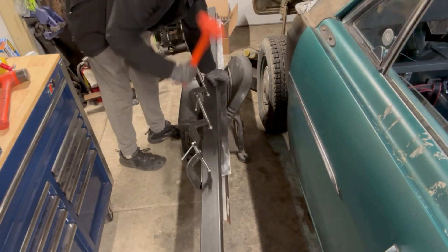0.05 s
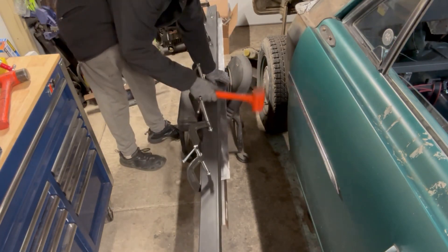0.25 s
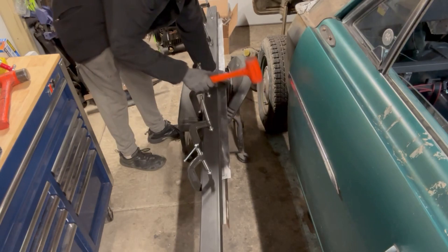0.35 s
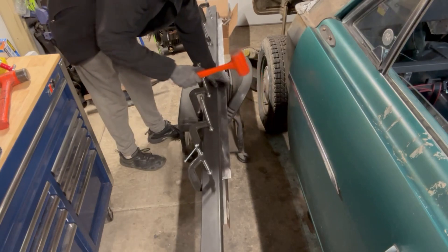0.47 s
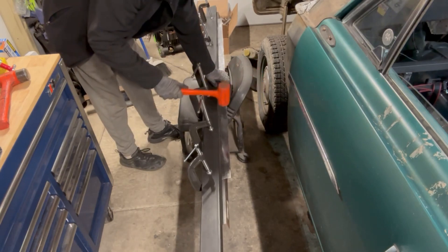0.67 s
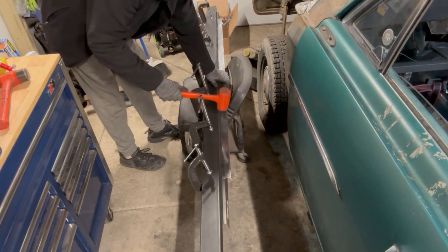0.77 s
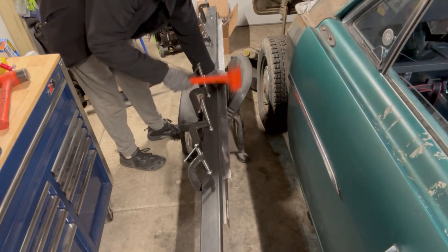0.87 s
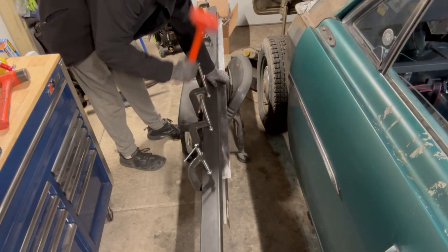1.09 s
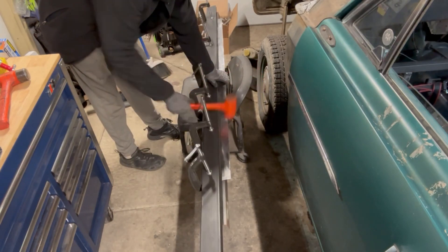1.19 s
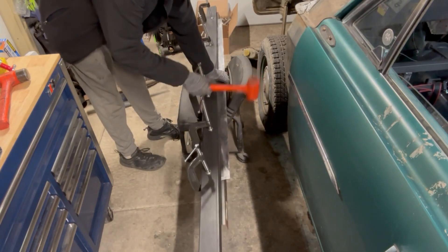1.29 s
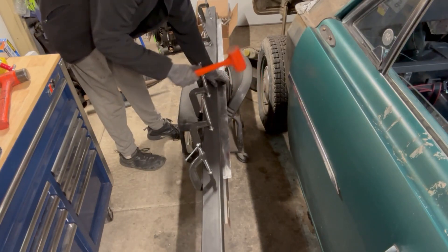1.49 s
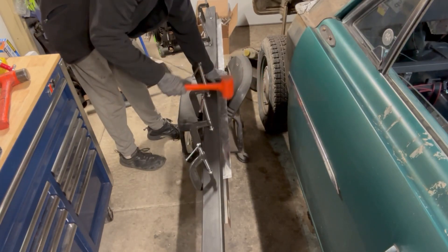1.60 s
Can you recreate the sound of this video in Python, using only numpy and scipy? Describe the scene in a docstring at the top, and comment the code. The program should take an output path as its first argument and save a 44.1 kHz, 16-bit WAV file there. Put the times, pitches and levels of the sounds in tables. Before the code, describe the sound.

Mallet blows on clamped sheet steel: the tail of an earlier hit fades, then two cracking, chattering clangs a second apart, with a faint sleeve rustle between, close stereo microphones in a quiet home garage.

```python
"""The tail of an earlier contact dies away over a quiet low floor, then a mallet hits sheet steel clamped over
a bending edge twice, in a home garage, close to a small stereo recorder. Each blow cracks and the sheet chatters
against the edge: noise shaped in bands that decay with the room, plus decaying sines for distinct pitched modes.
Between the blows a sleeve or glove rustles: coloured noise with a grainy level and small ticks."""
import sys
import numpy as np
from scipy import signal
from scipy.fft import rfft, irfft
from scipy.io import wavfile
from scipy.ndimage import uniform_filter1d

SR = 44100
rng = np.random.default_rng(int(sys.argv[2]) if len(sys.argv) > 2 else 0)


def store_wav(level_fs):
    """Save 16-bit WAV to argv[1]."""
    pcm = np.round(np.clip(np.atleast_2d(level_fs), -1, 1) * 32767)
    wavfile.write(sys.argv[1], SR, pcm.T.astype(np.int16))


def undo_db(level):
    """Turn decibels back into plain size, where 20 dB means ten times bigger."""
    steps = np.asarray(level, float) / 20
    return 10 ** steps


N = 72765  # samples in the scene


def evened(x):
    """Normalisation: scales to rms 1."""
    return x / np.sqrt(np.mean(x ** 2) + 1e-20)


def read(points, hz):
    """Interpolation on a log-frequency axis: reads a table of (frequency_hz, value)."""
    f, value = np.transpose(points)
    return np.interp(np.log(hz + 1), np.log(f + 1), value)


def add(mix, start_s, sound):
    """Superposition: mixes a stereo sound in; a negative start leaves only its later part."""
    at = round(start_s * SR)
    sound = sound[:, max(-at, 0):]
    part = mix[:, max(at, 0):][:, :sound.shape[1]]
    part += sound[:, :part.shape[1]]


def stereo_noise(size, tone, likeness):
    """Partial coherence: the right spectrum shares part of the left; both coloured by tone, rms 1."""
    hz = np.fft.rfftfreq(size, 1 / SR)
    left, other = rfft(rng.standard_normal((2, size)))
    shared = np.clip(read(likeness, hz), -1, 1)
    right = shared * left + np.sqrt(1 - shared ** 2) * other
    gain = undo_db(np.maximum(read(tone, hz), -100))
    return hz, np.array([left, right]) * gain / np.sqrt(np.mean(gain ** 2))


# Relative power spectrum of the dense clang: frequency_hz, density_db_per_hz
CLANG_TONE = [(24, -57.5), (40, -29), (277, -14), (348, -9.5), (561, -9.5), (818, -7.5), (882, -10.5),
              (1500, -5.5), (1700, -7), (1830, -6), (9610, -17), (14000, -32), (16300, -77)]
# Decay of the sheet's modes: frequency_hz, t60_s
SHEET_DECAY = [(60, .2), (200, .25), (500, .25), (1200, 0.25), (2500, 0.27), (5000, 0.31), (9000, 0.24),
               (15000, 0.19)]
# Decay of the room: frequency_hz, t60_s
ROOM_DECAY = [(60, .4), (250, .7), (1000, .5), (4000, 0.49), (9000, 0.42), (15000, .21)]
# Room level relative to the clang: frequency_hz, level_db
ROOM_LEVEL = [(60, -15.5), (250, -14), (1000, -14.5), (4000, -12.5), (9000, -21), (15000, -16.5)]
# Time constant of the clang's onset: frequency_hz, rise_s
CLANG_RISE = [(60, 0.0082), (300, 0.004), (1000, 0.0063), (4000, .001)]
# Relative power spectrum of the crack: frequency_hz, density_db_per_hz
CRACK_TONE = [(100, -33), (500, -8), (1500, -1), (3000, -2), (6000, -4), (10000, -8.5), (14000, -15.5),
              (16300, -28)]
# Left-right coherence of clang and crack: frequency_hz, likeness (no unit)
CLANG_LIKENESS = [(60, 0.24), (130, 0.84), (290, 0.24), (640, 0.098), (1410, 0.28), (3100, 0.3),
                  (6820, 0.041), (15000, 0.86)]
# Stereo balance of the clang: frequency_hz, left_minus_right_db
CLANG_BALANCE = [(60, -2), (180, 0.5), (550, -1.0), (1650, 0.5), (4970, 1.5), (15000, 1.5)]


def clang(level_db, tilt_db_per_octave, crack_db):
    """High modal density: close modes act as noise; after a short crack each band rises and dies at its own speed."""
    size = 32768
    crack_t60_s, crack_rise_s = 0.017, 0.0003
    t = np.arange(size) / SR

    hz, spectrum = stereo_noise(size, CLANG_TONE, CLANG_LIKENESS)
    # close modes gather in peaks and gaps, 3.5 dB rms about a 1 dB lift
    clumps = evened(uniform_filter1d(rng.standard_normal(len(hz)), size=20))
    spectrum = spectrum * undo_db(3.5 * clumps + 1.0)
    pan = undo_db(read(CLANG_BALANCE, hz) / 2)
    tilted_db = level_db + tilt_db_per_octave * np.log2((hz + 1) / 2000)
    spectrum = spectrum * undo_db(tilted_db) * np.array([pan, 1 / pan])

    crack_noise = irfft(stereo_noise(size, CRACK_TONE, CLANG_LIKENESS)[1])
    out = crack_noise * undo_db(crack_db - 60 * t / crack_t60_s) * (1 - np.exp(-t / crack_rise_s))

    mids_hz = np.geomspace(60, 15000, num=9)
    for k, mid_hz in enumerate(mids_hz):
        # overlapping triangular bands on the log-frequency axis
        share = np.interp(np.log(hz + 1), np.log(mids_hz), np.arange(len(mids_hz)) == k)
        sheet = undo_db(-60 * t / read(SHEET_DECAY, mid_hz))
        room = undo_db(read(ROOM_LEVEL, mid_hz) - 60 * t / read(ROOM_DECAY, mid_hz))
        rise = 1 - np.exp(-t / abs(read(CLANG_RISE, mid_hz)))
        out = out + irfft(spectrum * share) * np.sqrt(sheet ** 2 + room ** 2) * rise
    return out


# Mallet blows and the chatter of the sheet after them; a negative start lies before the scene:
# start_s, level_db, treble_tilt_db_per_octave, crack_db
CONTACTS = [(0.2486, -18.5, -0.5, -6), (0.2517, -25, -.5, -17), (0.2581, -21.5, 0, -14.5),
            (0.2656, -20, 2, -7), (0.2767, -25.5, -3, -13.5), (0.315, -38, 0, -38.5),
            (0.375, -48.5, 1.5, -45.5), (0.410, -44.5, -1, -53), (0.443, -49.5, 0, -43),
            (1.2929, -21, -1, -8), (1.2967, -22, 0, -16), (1.3046, -19.5, 1.5, -24.5),
            (1.3110, -18.5, -1, -19), (1.3280, -28, -1.5, -24), (1.345, -35, -4.5, -32),
            (1.40, -49, -1.5, -43), (1.47, -50, -2, -59), (-0.30, -20, -2, -19)]
# Full blows, each on its own spot: start_s
BLOWS = [0.2486, 1.2932]


def steel():
    """Impact excitation: every contact clangs; the full blows also set the distinct pitched modes going."""
    out = np.zeros((2, N))
    for start_s, level_db, tilt_db_per_octave, crack_db in CONTACTS:
        add(out, start_s, clang(level_db, tilt_db_per_octave, crack_db))
    for spot, start_s in enumerate(BLOWS):
        add(out, start_s, rings(spot))
    return out


# Relative power spectrum of the floor: frequency_hz, density_db_per_hz
FLOOR_TONE = [(12, -40.5), (30, -19.5), (55, -1), (75, -3.5), (120, -9), (250, -13), (500, -20.5),
              (800, -21.5), (1100, -29), (1600, -34.5), (3200, -38), (6300, -53.5), (13000, -60),
              (16000, -66)]
# Floor level over time, before a fixed lift: time_s, level_before_lift_db
FLOOR_COURSE = [(0.0, -72.5), (0.348, -66.5), (1.074, -70.5), (1.286, -64.5), (1.65, -73.5)]
# Left-right coherence of the floor: frequency_hz, likeness (no unit)
FLOOR_LIKENESS = [(60, 0.95), (180, 0.82), (550, 0.35), (1650, 0.17), (4970, 0.1), (15000, 0.18)]


def floor():
    """Broadband noise weighted to low frequencies: the rumble of the garage and faint hiss."""
    time_s, level_db = np.transpose(FLOOR_COURSE)
    noise = irfft(stereo_noise(N + 1, FLOOR_TONE, FLOOR_LIKENESS)[1])[:, :N]
    lift_db = 8.5
    return noise * undo_db(np.interp(np.arange(N) / SR, time_s, level_db) + lift_db)


# Distinct pitched modes of sheet and edge bar: pitch_hz
MODE_PITCH = [72, 175, 245, 328, 409, 490, 700, 736, 828, 1039, 1320, 1476, 1529, 1626, 1800, 1871, 2045,
              2270, 2392, 2621, 2878, 3141, 3827, 4201, 4384, 4737]
# The same modes in order, some short, some longer: t60_s, level_at_spot_0_db, level_at_spot_1_db
MODE_RING = [(.15, -52, -35.5), (.25, -33.5, -31), (.85, -42, -44.5), (.75, -39.5, -44.5),
             (0.7, -45.5, -37), (.5, -38, -35.5), (.2, -41, -29.5), (.55, -37.5, -37), (0.26, -31.5, -27),
             (.2, -25.5, -24.5), (.2, -19, -19), (0.47, -28.5, -23.5), (.5, -27, -30), (.25, -36, -19),
             (.22, -26.5, -22.5), (.2, -29.5, -21), (.22, -28, -24), (.22, -27, -28), (.22, -32, -44.5),
             (.2, -29.5, -40), (.22, -30.5, -32), (.2, -26.5, -33.5), (0.18, -22, -48.5), (.55, -54.5, -29),
             (.22, -37, -23), (.15, -34.5, -38.5)]


def rings(spot):
    """Modal superposition: decaying sines, each reaching the two microphones with its own phase."""
    t = np.arange(32768) / SR
    rise_s, phase_spread_rad = 0.012, 0.27
    hz = np.array(MODE_PITCH)[:, None]
    t60_s, *levels_db = np.transpose(MODE_RING)[:, :, None]
    left_phase = rng.uniform(0, 2 * np.pi, (len(MODE_RING), 1))
    phase_offset = phase_spread_rad * rng.standard_normal((len(MODE_RING), 1))
    # axes: microphone, mode, time
    phase = left_phase + np.array([0, 1])[:, None, None] * phase_offset
    envelope = undo_db(levels_db[spot] - 60 * t / t60_s) * (1 - np.exp(-t / rise_s))
    return (envelope * np.sin(2 * np.pi * hz * t + phase)).sum(1)


# Level course of the scuff: time_s, level_db
RUSTLE_COURSE = [(0.74, -84), (0.80, -72), (0.84, -68.5), (0.86, -64.5), (0.901, -61.5), (0.956, -56.5),
                 (1.01, -59), (1.04, -65), (1.08, -73), (1.138, -91)]
# Relative power spectrum of the cloth: frequency_hz, density_db_per_hz
CLOTH_TONE = [(200, -12.5), (500, -5.5), (900, -4.5), (1250, -3), (1750, -8), (2300, -9.5), (3190, -5.5),
              (3900, -12), (4990, -18.5), (14000, -35)]
# Small ticks in the scuff: start_s, level_db
CLOTH_TICKS = [(0.8046, -59.5), (0.8459, -58.5), (0.9064, -70), (0.9297, -74), (0.9437, -61.5),
               (0.9874, -66)]


def rustle():
    """Granular friction: many cloth grains in a soft scuff, with a few small ticks, while the arm lifts."""
    grains_per_s, grain_db, lump_s, tick_t60_s, likeness = 2500, 1, 0.0078, 0.04, 0.3
    t = np.arange(N) / SR
    noise = irfft(stereo_noise(N + 1, CLOTH_TONE, [(100, likeness), (9000, likeness)])[1])[:, :N]

    sizes = undo_db(grain_db * np.minimum(rng.exponential(1, N), 4))
    grains = sizes * (rng.random(N) < grains_per_s / SR)
    lumps = evened(signal.lfilter([1], [1, -np.exp(-1 / (lump_s * SR))], grains))

    time_s, course_db = np.transpose(RUSTLE_COURSE)
    level = lumps * undo_db(np.interp(t, time_s, course_db, left=-120, right=-120))
    for start_s, tick_db in CLOTH_TICKS:
        level = level + (t > start_s) * undo_db(tick_db - 60 * abs(t - start_s) / tick_t60_s)
    return noise * level


def scene():
    """Linear superposition of steel, rustle and floor."""
    return steel() + rustle() + floor()


def band_limit(x):
    """A steep low-pass at the top of the band."""
    return signal.sosfilt(signal.butter(12, 16450, fs=SR, output="sos"), x)


def record(dry):
    """Downward expansion: a soft noise gate makes tails fall away faster at the end; then a band limit."""
    gate_below_db, gate_slope, gate_depth_db, gate_sense_s = -45.5, 0.44, 8.5, 0.015
    keep = np.exp(-1 / (gate_sense_s * SR))
    instant_power = (dry ** 2).mean(0)
    slow_power = signal.lfilter([1 - keep], [1, -keep], instant_power)
    # the short average lets the gate open quickly
    power = np.maximum(slow_power, uniform_filter1d(instant_power, size=128))
    power_db = 10 * np.log10(power + 1e-12)
    cut_db = np.clip(gate_slope * (gate_below_db - power_db), 0, gate_depth_db)
    gated = dry / undo_db(uniform_filter1d(cut_db, size=128))

    low_pass = signal.firwin(255, 16400, window=("kaiser", 9), fs=SR)  # edge in Hz
    mix = signal.oaconvolve(gated, low_pass[None], "same", axes=1)
    return band_limit(mix)


dry = scene()
out = record(dry)
store_wav(out)
```